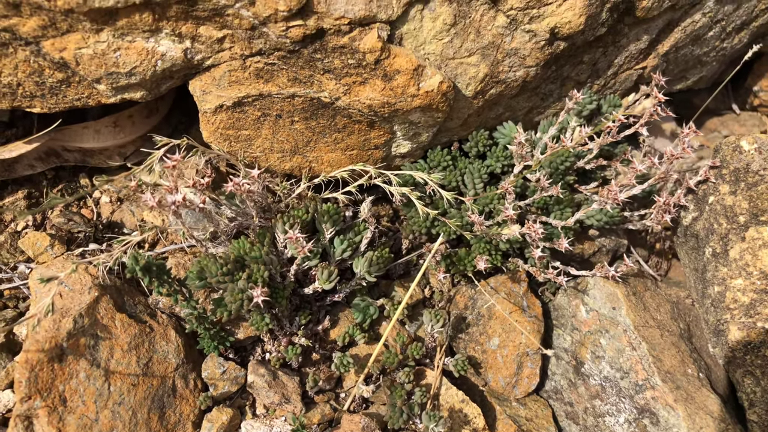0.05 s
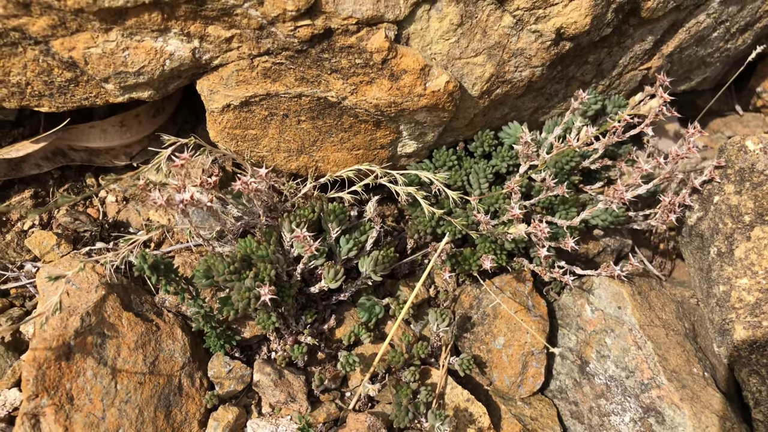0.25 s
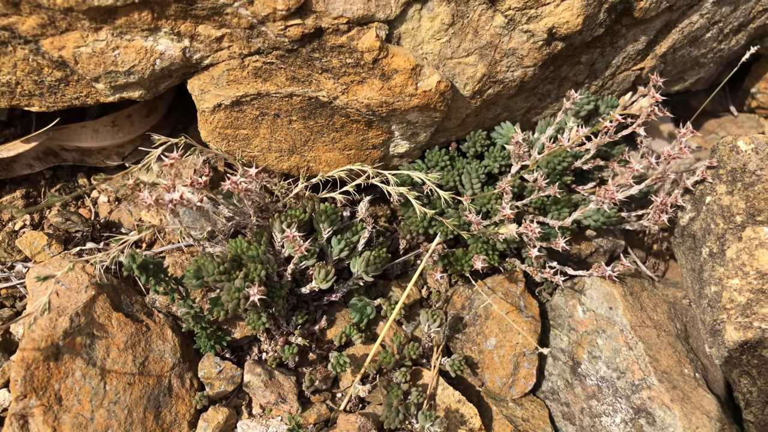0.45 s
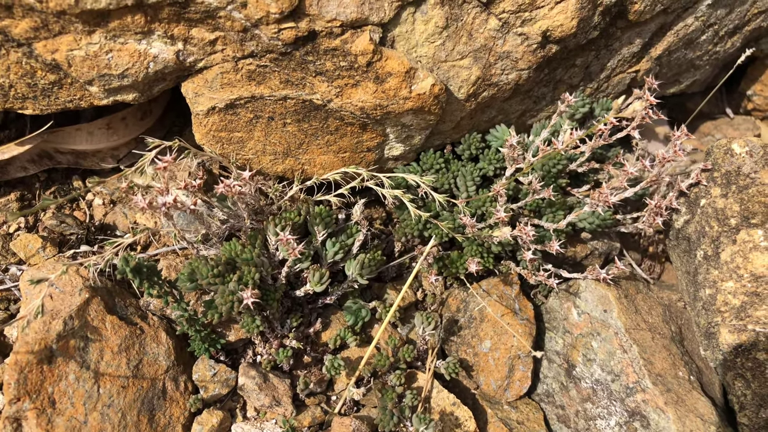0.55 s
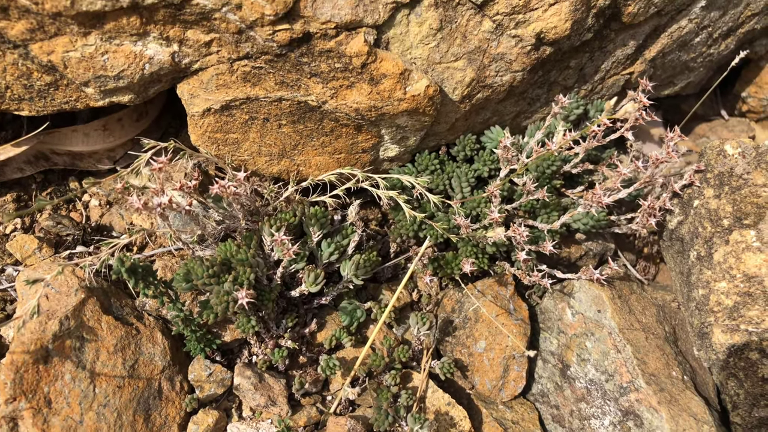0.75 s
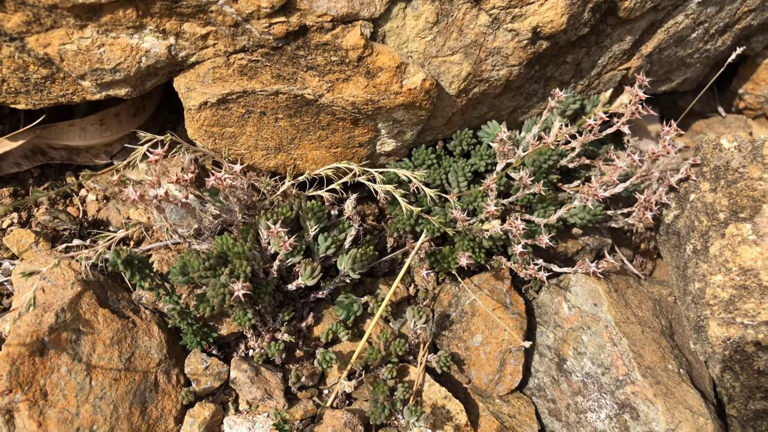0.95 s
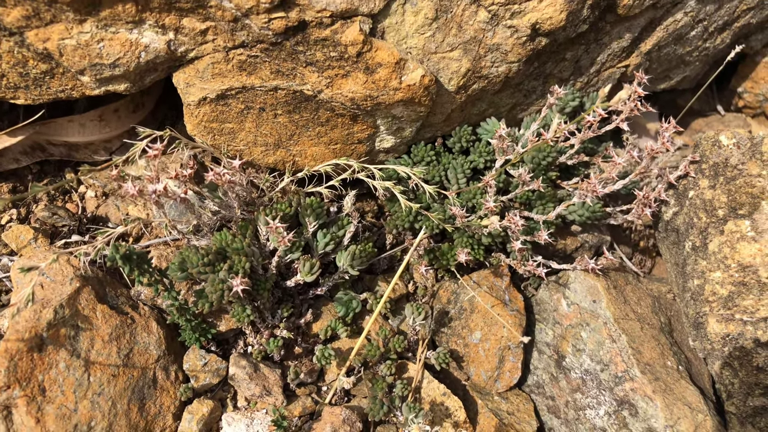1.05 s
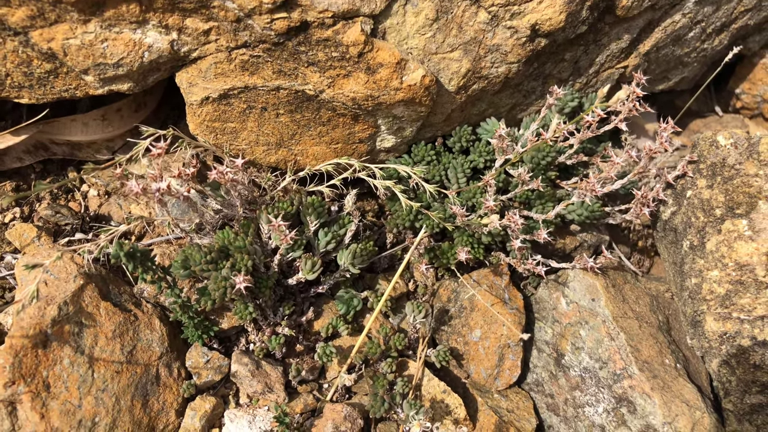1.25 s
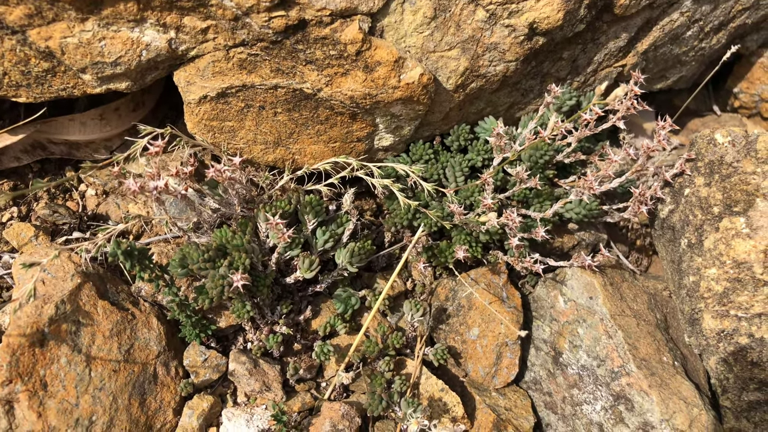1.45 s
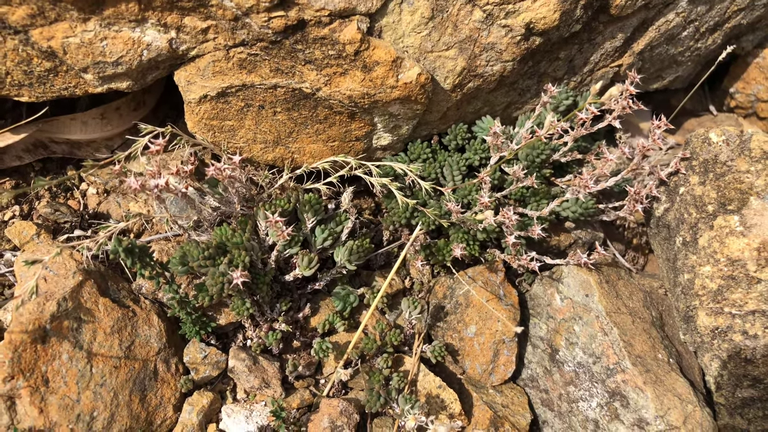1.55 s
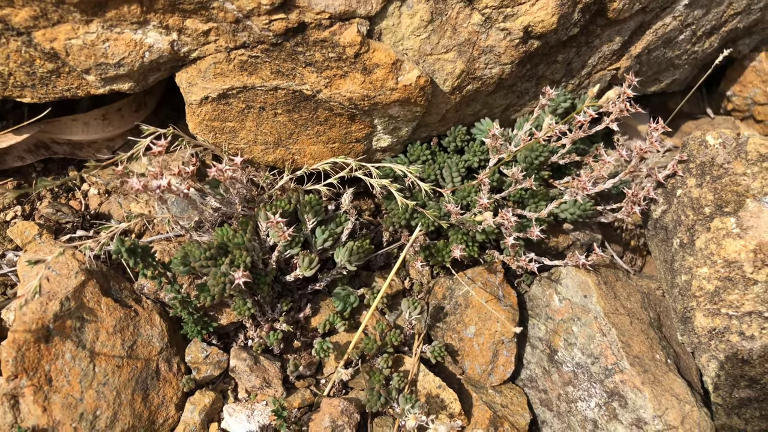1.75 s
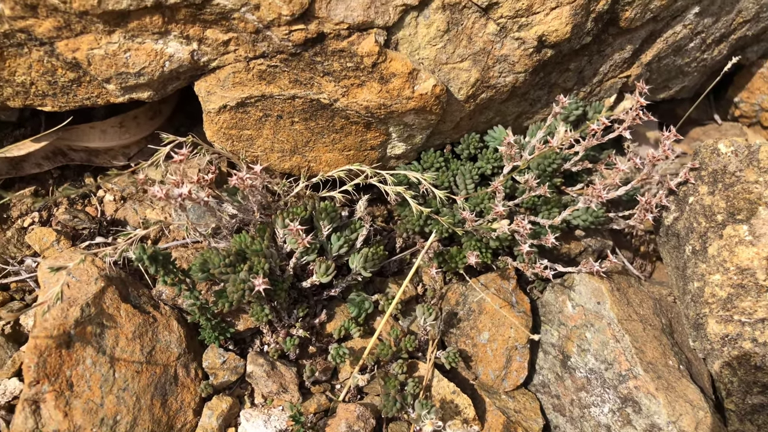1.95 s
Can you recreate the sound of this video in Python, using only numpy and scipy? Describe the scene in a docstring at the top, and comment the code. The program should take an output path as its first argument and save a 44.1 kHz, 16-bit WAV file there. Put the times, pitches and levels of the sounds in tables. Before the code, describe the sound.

A grasshopper chirrs close by in fast, high strokes, with more sizzling further off.

```python
"""Dry scrub, one microphone close to a grasshopper that rubs its legs over its wings about nine times a second.
Each stroke is a train of tooth clicks that rings the wing: it swells, brightens, stutters and stops short.
A lower-pitched neighbour joins in for a moment, more chirr further off, and the scrub rustles faintly.
Under it all lie open air, a soft rumble and a far drone like an engine. Both channels are the same."""
import sys
import numpy as np
from scipy import signal
from scipy.fft import rfft, irfft
from scipy.io import wavfile
from scipy.ndimage import uniform_filter1d

SR = 44100
rng = np.random.default_rng(int(sys.argv[2]) if len(sys.argv) > 2 else 0)


def store_pcm(level_fs):
    """Save levels as 16-bit WAV."""
    pcm = np.round(np.clip(level_fs, -1, 1) * 32767).astype(np.int16)
    wavfile.write(sys.argv[1], SR, np.atleast_2d(pcm).T)


N = 88200
T = np.arange(N) / SR
BINS = np.arange(N // 2 + 1) * SR / N
TOOTH_HZ, TOOTH_JITTER, TOOTH_SCATTER_DB = 2299, .3, 3

# wing resonances in three groups: (frequency [Hz], width [Hz], relative level [dB])
LOW_MODES = [(4520, 210, -11.5), (5126, 520, -6), (6052, 500, -3), (6725, 480, -3.5), (7280, 650, -1.5),
             (7900, 620, -2)]
MID_MODES = [(8824, 370, 0.058), (9260, 340, 0.025)]
HIGH_MODES = [(9900, 380, -1), (10500, 1260, -0.5), (11600, 660, -0.5), (12380, 1000, 1.5),
              (13460, 400, -4.5), (14200, 380, 1.5), (14900, 1000, 2.5)]


def near_grasshopper():
    """Close to the microphone, each stroke rings the wing's low resonances first and its high ones last."""
    # drive of each group along a stroke: (position [share of stroke], relative level [dB])
    low_swell = [(0, -18.5), (.25, -8), (.45, 1), (.62, 1.5), (.82, 1), (1, -4)]
    mid_swell = [(0, -27), (.25, -4.5), (.45, -8), (.62, 2.5), (.8, -3), (1, -3)]
    high_swell = [(0, -18), (.3, -9.5), (.52, -11.5), (.68, -4), (.84, -4.5), (1, -1)]
    # friction of the leg: (frequency [Hz], relative level [dB])
    friction = [(600, -21.5), (1500, -4), (2800, -0.5), (4200, 2.5), (6000, -12)]
    force, along, mid_gain = leg_strokes()
    clicks = force * teeth(TOOTH_HZ, TOOTH_JITTER, TOOTH_SCATTER_DB)
    low = ring(clicks * curve(low_swell, along), resonances(LOW_MODES))
    middle = ring(clicks * curve(mid_swell, along) * mid_gain, resonances(MID_MODES))
    high = ring(clicks * curve(high_swell, along), resonances(HIGH_MODES))
    scrape = ring(force * curve(low_swell, along) * rng.standard_normal(N), colour(friction))
    wing = level(low, db=-58.5) + level(middle, db=-60.5) + level(high, db=-57)
    return wing + level(scrape, db=-76.5) + gliding_ring(force * mid_gain, along)


def leg_strokes():
    """The leg skips harder as a stroke ends. Gives its force, its position and the middle ring's gain."""
    # strokes: (end [s], length [s], relative level [dB], middle and gliding ring [dB], stutter depth [0-1])
    strokes = [(0.089, 0.1, 1, -1, 0.6), (0.199, .104, .5, -1.5, 0.4), (0.308, .1, 0.6, -2.5, 0.5),
               (.418, 0.12, 0, -1, 0.87), (.527, 0.11, -0.5, 1, 1), (0.635, 0.11, 1, -2.5, 1),
               (0.744, 0.11, -0.5, -0.5, 0.5), (0.854, 0.12, -0.2, -1.5, .5), (0.966, .11, -0.6, -.5, 0.3),
               (1.075, .11, -1, 0.5, .8), (1.186, 0.11, -.3, -1.5, 0.6), (1.298, 0.11, 0.5, -0.5, 0.7),
               (1.410, .108, -0.1, -2, 0.3), (1.522, .1, 0.5, -2, 0.4), (1.635, 0.11, 0, -1.5, 0.6),
               (1.751, 0.11, -0.7, -1.5, 0.16), (1.866, 0.11, 0, -0.5, 0.53), (1.984, 0.11, -0.8, 0, .45)]
    # after some strokes the leg catches once more: (time [s], length [s], relative level [dB])
    catches = [(.100, 0.0053, -9), (1.306, 0.0046, 0), (1.414, .004, -3), (1.643, .009, 0),
               (1.755, 0.0026, -5)]
    release_s, stutter_s, stutter_fade_s, pressure_db = .0019, .0136, .055, 1.15
    gap_at, gap_width, gap_wander = .85, .17, .052  # shares of the stutter period
    ends, length, db, mid_db, depth = np.array(strokes).T
    k = np.minimum(np.searchsorted(ends, T), len(ends) - 1)
    left_s = ends[k] - T
    along = 1 - left_s / length[k]
    from_gap = (left_s / stutter_s + gap_wander * flicker(60) - gap_at + .5) % 1 - .5
    gaps = depth[k] * np.exp(-(from_gap / gap_width) ** 4 - (left_s / stutter_fade_s) ** 2)
    pressure = undb(db[k] + pressure_db * flicker(150))
    force = pressure * np.clip(left_s / release_s, 0, 1) * (1 - gaps)
    for at, lasts, catch_db in catches:
        caught = abs(T - at) < lasts / 2
        force[caught], along[caught] = undb(catch_db), 1
    return force, along, undb(mid_db[k])


def gliding_ring(force, along):
    """Tooth clicks drive one resonance that sinks and then climbs as the leg travels over the wing."""
    # the ring's path: (position [share of stroke], frequency at full climb [Hz], relative level [dB])
    glide = [(0, 11400, -15), (.18, 10460, -7.5), (.33, 9300, -5.5), (.48, 8980, 0), (.6, 8930, -2.5),
             (0.692, 10930, -3.5), (.8, 11870, -2.5), (0.999, 14600, -3)]
    # its reach above the lowest pitch as the song goes on: (time [s], reach [share of full climb])
    climb = [(0, 0.93), (1.0, 0.97), (1.4, 0.71), (2, 0.9)]
    share, hz, db = np.array(glide).T
    clicks = force * undb(np.interp(along, share, db)) * teeth(TOOTH_HZ, TOOTH_JITTER, TOOTH_SCATTER_DB)
    rise_hz = (np.interp(along, share, hz) - hz.min()) * np.interp(T, *np.array(climb).T)
    centre_hz = (hz.min() + rise_hz) * (1 + .022 * walk(40))
    tone = moving_ring(clicks, centre_hz, width_hz=870)
    return level(ring(tone, resonances(LOW_MODES + MID_MODES + HIGH_MODES)), db=-56.5)


def teeth(rate_hz, jitter, scatter_db, count=9000):
    """Pegs of the leg slip over a wing vein: one click each, uneven in spacing and size."""
    gap, size = rng.uniform(-1, 1, (count, 2)).T * np.sqrt(3)  # unit spread
    at = (np.cumsum(np.exp(jitter * gap)) * SR / rate_hz).astype(int)
    return np.bincount(at[at < N], undb(scatter_db * size)[at < N], N)


def neighbour():
    """Another grasshopper rasps on the low wing resonances, swelling and fading once."""
    peak_s, half_s, tooth_hz = 1.16, .28, 2467
    clicks = undb(2.9 * flicker(140)) * teeth(tooth_hz, TOOTH_JITTER, TOOTH_SCATTER_DB)
    swell = np.exp(-((T - peak_s) / half_s) ** 2)
    return level(ring(clicks, resonances(LOW_MODES)), db=-64) * swell


def chorus(count=4):
    """Grasshoppers further off, each at its own pace, merge into a flickering sizzle."""
    # their joint spectrum: (frequency [Hz], relative level [dB])
    spectrum = [(2500, -22.5), (4200, -13), (5100, -10.5), (5550, -13), (6050, -10.5), (6400, -9.5),
                (7500, -3.5), (8250, -6), (8900, -4), (10500, -5), (12000, -2.5), (12700, -4.5),
                (14000, -2), (15500, -4)]
    # their loudness at the microphone: (time [s], level [dB])
    loudness = [(0, -55), (.5, -53), (.8, -53), (1.2, -53.5), (1.42, -56), (1.7, -55.5), (1.88, -58.5),
                (2, -50)]
    stroke_hz, tooth_hz, swell_db, flicker_db = 8.1, 1002.7, 3.5, 3.01
    clicks = 0
    for _ in range(count):
        pace, start = rng.standard_normal(2)
        stroke = np.sin(2 * np.pi * (stroke_hz * np.exp(.15 * pace) * T + start))
        force = undb(swell_db * stroke + flicker_db * np.tanh(flicker(140)))
        clicks += force * teeth(tooth_hz, jitter=.5, scatter_db=2.5)
    low_cut = BINS ** 2 / (BINS ** 2 + 2000 ** 2)
    return level(ring(clicks, colour(spectrum) * low_cut)) * curve(loudness, T)


def rustles():
    """The dry scrub stirs in brief, soft swells of crackly noise."""
    # rustles: (time [s], half length [s], frequency [Hz], width [Hz], level at the crest [dB])
    swells = [(.45, 0.21, 1870, 900, -76.5), (1.992, 0.012, 4040, 3630, -62.5)]
    out = 0
    for at, half, hz, width, db in swells:
        crackle = rng.standard_normal(N) * undb(2 * flicker(200))
        band = ring(crackle, resonances([(hz, width, 0)]))
        out += level(band, db) * np.exp(-((T - at) / half) ** 2)
    return out


def open_air():
    """A faint, steady wash of outdoor noise."""
    # spectrum of the air: (frequency [Hz], relative level [dB])
    spectrum = [(120, -31), (200, -5.5), (232, 1.5), (284, -4.5), (736, -17.5), (1610, -23), (2140, -27.5),
                (3000, -29), (3900, -38), (6600, -120)]
    low_cut = BINS ** 4 / (BINS ** 4 + 180 ** 4)
    return level(ring(rng.standard_normal(N), colour(spectrum) * low_cut), db=-65)


def rumble():
    """Deep outdoor noise swells and sinks."""
    # spectrum of the rumble: (frequency [Hz], relative level [dB])
    spectrum = [(20, -41), (32, -27.5), (48, -10), (62, -3), (78, 1.5), (100, -3), (135, -6.5), (190, -8.5),
                (260, -20.5), (500, -43)]
    # its swells: (time [s], level [dB])
    loudness = [(0, -58), (.04, -59.5), (.14, -54.5), (.25, -52), (.33, -58.5), (.45, -54.5), (.51, -57),
                (.63, -60.5), (.73, -50.5), (.82, -58.5), (1.05, -55.5), (1.11, -55.5), (1.25, -55.5),
                (1.4, -57.5), (1.62, -54.5), (1.76, -56), (1.83, -54), (2, -57)]
    return level(ring(rng.standard_normal(N), colour(spectrum))) * curve(loudness, T)


def far_drone(pitch_hz=165.1, waver=.0032):
    """One slightly wavering tone, like an engine in the distance."""
    # its loudness at the microphone: (time [s], level [dB])
    loudness = [(0, -62), (.18, -70.5), (.25, -56.5), (.33, -63), (.5, -66.5), (.9, -68.5), (1.15, -65.5),
                (1.35, -59), (1.6, -57), (1.82, -56.5), (2, -59)]
    hz = pitch_hz * (1 + waver * walk(8))
    return level(np.sin(2 * np.pi * np.cumsum(hz) / SR)) * curve(loudness, T)


def undb(db):
    """Decibels to gain."""
    return 10 ** (np.asarray(db) / 20)


def level(x, db=0):
    """Set the rms level."""
    return x * undb(db) / np.sqrt(np.mean(x ** 2))


def curve(rows, at):
    """Gain along a table of (time or position, level [dB])."""
    return undb(np.interp(at, *np.array(rows).T))


def walk(rate_hz):
    """Smooth random wander with a spread near 1."""
    k = max(int(SR / rate_hz), 2)
    steps = np.repeat(rng.standard_normal(N // k + 1), k)
    return 1.3 * uniform_filter1d(uniform_filter1d(steps, k), k)[:N]


def flicker(rate_hz, slowest_hz=35):
    """Quick random wander without slow drift."""
    wander = walk(rate_hz)
    return wander - uniform_filter1d(wander, int(SR / slowest_hz))


def ring(x, gain):
    """Minimum-phase filter with the given gain at each frequency."""
    cepstrum = irfft(np.log(gain + 1e-5), N)
    cepstrum[1:N // 2] *= 2
    cepstrum[N // 2 + 1:] = 0
    return irfft(rfft(x) * np.exp(rfft(cepstrum)), N)


def moving_ring(x, hz, width_hz):
    """A single resonance whose centre moves."""
    turn = np.exp(2j * np.pi * np.cumsum(hz) / SR)
    pole = np.exp(-np.pi * width_hz / SR)
    return (turn * signal.lfilter([1], [1, -pole], x / turn)).real


def colour(points):
    """Gain per frequency from (frequency [Hz], level [dB]) points."""
    hz, db = np.array(points).T
    return undb(np.interp(np.log(BINS + 1), np.log(hz), db))


def resonances(rows):
    """Gain per frequency of steep-sided resonances, summed in power."""
    peaks = (undb(db) / (1 + 2 * ((BINS - hz) / width) ** 2) ** 1.4 for hz, width, db in rows)
    return np.sqrt(sum(peak ** 2 for peak in peaks))


def scene():
    """Everything reaches one microphone, which feeds both channels."""
    insects = near_grasshopper() + neighbour() + chorus()
    mono = insects + rustles() + open_air() + rumble() + far_drone()
    return np.array([mono, mono])


def record(dry):
    """The recorder cuts the top steeply."""
    top_hz = 15450
    return signal.sosfilt(signal.ellip(12, .1, 80, top_hz, fs=SR, output="sos"), dry)


dry = scene()
out = record(dry)
store_pcm(out)
```